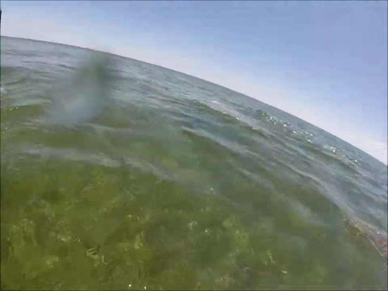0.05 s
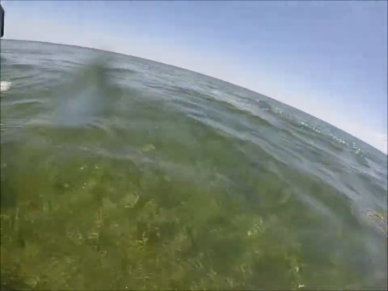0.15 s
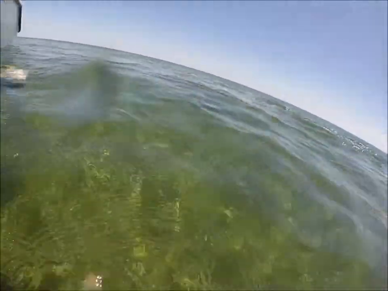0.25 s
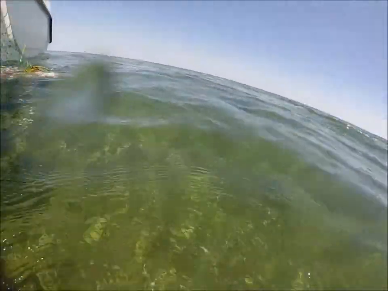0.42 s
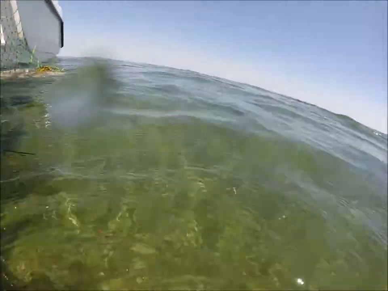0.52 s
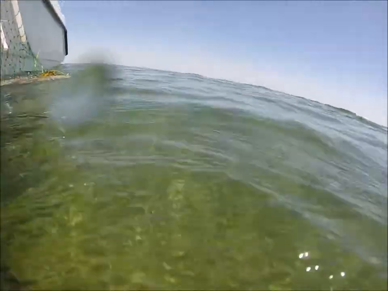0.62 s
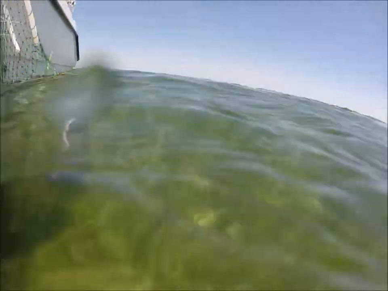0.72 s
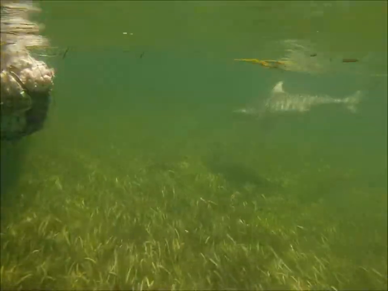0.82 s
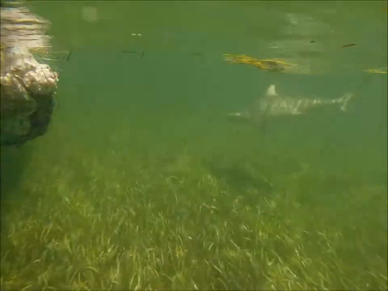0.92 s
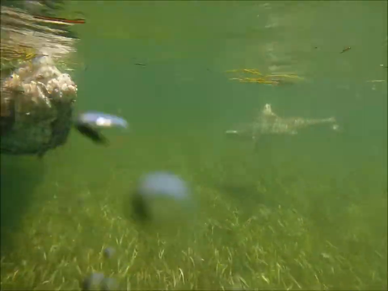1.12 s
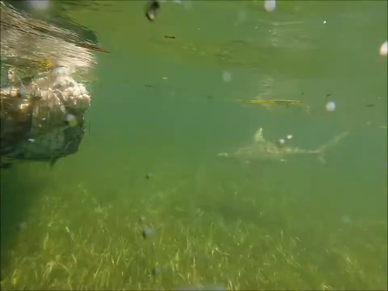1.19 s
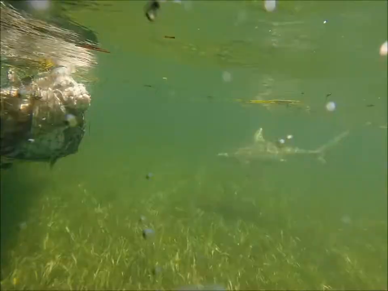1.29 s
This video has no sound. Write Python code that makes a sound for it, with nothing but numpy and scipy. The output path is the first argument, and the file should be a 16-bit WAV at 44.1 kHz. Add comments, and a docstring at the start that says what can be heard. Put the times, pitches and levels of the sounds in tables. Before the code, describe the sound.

Water gurgles and splashes against a small sealed case dunked into calm sea, then muffled quiet

```python
"""Bubbles and deep glugs ring against a small sealed case dipped twice into a calm sea, then kept under.
Each is a short, dying sine with three smaller ones close by, and faint case tones ring along.
Swarms of tiny rings make the small bubbles, slosh and fizz of the churn; short tones with puffs of noise
make drops snap on the shell. Low noise rumbles with the swell and a microphone hisses faintly."""
import sys
import numpy as np
from scipy import signal
from scipy.fft import rfft, irfft
from scipy.io import wavfile

SR = 44100
rng = np.random.default_rng(int(sys.argv[2]) if len(sys.argv) > 2 else 0)


def makeup_ratio(level_db):
    """Linear amplitude ratio for a level in decibels (20 dB per factor of ten)."""
    decades = np.asarray(level_db, float) / 20
    return 10 ** decades


def digitize_waveform(pressure):
    """Quantize a signal to 16-bit integers and store it at the path in sys.argv[1].

    Rows of a 2-D input are taken as channels; values are limited to [-1, 1].
    """
    field = np.atleast_2d(pressure).T
    bounded = np.clip(field, -1, 1)
    quanta = np.round(bounded * 32767).astype(np.int16)
    wavfile.write(sys.argv[1], SR, quanta)


N = 59535  # length in samples, 1.35 s


def rms_one(x):
    """Scales a sound to an rms of 1."""
    return x / np.sqrt(np.mean(x ** 2) + 1e-20)


def in_time(rows):
    """Columns of a table joined by straight lines in time."""
    seconds, *columns = np.transpose(rows)
    return [np.interp(np.arange(N) / SR, seconds, column) for column in columns]


def ring(clicks, hz, t60):
    """A resonance: a unit click sets a sine ringing that falls by 60 dB in t60 seconds."""
    shrink = makeup_ratio(-60 / (t60 * SR))  # per sample
    turn = 2 * np.pi * hz / SR
    # the tiny offset keeps the filter clear of extremely small numbers
    return signal.lfilter([0, np.sin(turn)], [1, -2 * shrink * np.cos(turn), shrink ** 2], clicks + 1e-18)


def coloured_noise(spectrum):
    """Noise of rms 1, shaped by rows of Hz and relative dB per Hz."""
    hz, db = np.transpose(spectrum)
    grid = np.fft.rfftfreq(N, 1 / SR) + 1e-3
    shape_db = np.interp(np.log(grid), np.log(hz), db, -150, -150)
    return rms_one(irfft(rfft(rng.standard_normal(N)) * makeup_ratio(shape_db), N))


def add(out, start_s, sound):
    """Mixes a short sound into out, cut off at its end."""
    i = int(start_s * SR)
    out[i:i + len(sound)] += sound[:len(out) - i]


def swarm(level_db, per_s, cycles, low_hz, high_hz, spread_db, tilt_db):
    """Many small rings at random moments, sizes and pitches, each swelling softly."""
    sizes = makeup_ratio(spread_db * np.minimum(rng.exponential(1, N), 4)) * rng.choice([-1, 1], N)
    born = rng.random(N) < per_s / SR
    dealt = rng.integers(0, 24, N)  # which of 24 pitches each ring gets
    pitches = np.geomspace(low_hz, high_hz, 24)
    gains = makeup_ratio(np.linspace(0, tilt_db, 24))  # tilt: highest pitch against lowest
    rings = np.zeros(N)
    for k, (hz, gain) in enumerate(zip(pitches, gains)):
        clicks = sizes * born * (dealt == k)
        # the second, shorter resonance softens the start
        rings += gain * hz * ring(ring(clicks, hz, cycles / hz), hz, 5 / hz)
    return makeup_ratio(level_db) * rms_one(rings)


def bubble(hz, cycles):
    """A pocket of air swells in about a cycle, rings and dies, rising a little in pitch."""
    c = np.arange(int((cycles + 2) / hz * SR)) * hz / SR  # time counted in cycles
    shape = (1 - np.exp(-c / BIRTH_CYCLES)) ** 2 * makeup_ratio(-60 * c / cycles)
    return shape * np.sin(2 * np.pi * c * (1 + 0.0004 * c))


# Single bubbles and glugs, loud and faint, before the case muffles them. Each row: time in seconds,
# level in dB, starting pitch in Hz, cycles to die by 60 dB.
BUBBLES = [(0.092, -26.5, 1150, 6), (0.1879, -13.5, 3040, 40), (0.2005, -3, 2550, 16.5),
           (0.2043, -7, 269, 9), (0.2104, -9.5, 2560, 57), (0.2253, -3, 1870, 20), (0.2361, -7.5, 979, 65),
           (0.2378, 0, 1090, 12), (0.2376, -14, 154, 12), (0.273, -11, 1030, 15.5), (0.2814, -14, 2420, 27),
           (0.2924, -6, 2070, 12.5), (0.3152, -11, 1055, 61.5), (0.3186, -10.5, 1400, 33),
           (0.3518, -12.5, 1910, 41), (0.355, -22.5, 222.4, 45), (0.4084, -9.5, 2930, 32),
           (0.4113, -2.5, 2220, 7.5), (0.4696, -6.5, 2160, 12), (0.5065, 4.5, 2150, 13.5),
           (0.508, -5, 1110, 32.5), (0.5122, 1.5, 2620, 17.5), (0.5116, -15.5, 229, 55),
           (0.5143, -9, 3640, 55), (0.5303, -5, 2380, 20), (0.5487, -10.5, 1245, 23), (0.545, -17, 207, 20),
           (0.5761, 1, 2063, 17), (0.5787, -8, 2250, 57.5), (0.5868, -13.5, 192, 11),
           (0.5901, 6, 1185, 6.5), (0.6128, 1.5, 1182, 22.5), (0.6191, 2, 1560, 29.5),
           (0.6218, -9, 1190, 20), (0.647, -12, 2340, 28), (0.6713, -12, 1725, 32), (0.6796, -1, 1660, 27),
           (0.6898, -13.5, 590, 22.5), (0.706, -2, 2470, 9.5), (0.7136, -5.5, 686, 9),
           (0.722, -12.5, 586, 20), (0.7399, -9, 741, 21.5), (0.746, -6.5, 389, 7.5), (0.7476, -4, 590, 12),
           (0.749, -12, 2067, 57), (0.7673, -4.5, 597, 9.5), (0.8005, -19, 1430, 48),
           (0.8041, -13.5, 960, 13.5), (0.834, -19, 2580, 43), (0.839, -15, 1560, 6),
           (0.8401, -7.5, 1007, 22), (0.8414, 8, 1810, 5), (0.8654, -4, 1490, 3.5),
           (0.8936, 5.5, 2740, 12.5), (0.8989, 4.5, 1600, 12.5), (0.9, -8.5, 1062, 17),
           (0.926, -29, 1680, 27.5), (0.981, -52, 1700, 62), (1.013, -43.5, 482, 70),
           (1.028, -24, 1510, 39), (1.0487, -21, 2394, 46), (1.059, -19, 1132, 13.5),
           (1.0597, -16.5, 612, 14.5), (1.078, -35.5, 868, 96), (1.121, -13, 597, 9),
           (1.1337, -32.5, 733, 90), (1.136, -34.5, 1367, 70), (1.159, -41.5, 1692, 66.5),
           (1.1685, -34, 683, 101), (1.198, -35, 2590, 59), (1.254, -34.5, 1300.0, 36.5),
           (1.3402, -23.5, 630, 6.5)]
BIRTH_CYCLES = 0.58  # how slowly a bubble swells


def bubbles():
    """Every single bubble sheds three smaller ones, which ring just after it at nearby pitches."""
    mate_db, loss_db_per_cycle = -10.5, 0.1  # long-ringing bubbles shed fainter ones
    pitch_spread, lag_cycles, longest_cycles = 0.2, 5.0, 20.3
    out = np.zeros(N)
    chance = rng.uniform(-0.997, 1, (len(BUBBLES), 3, 2))
    for (s, db, hz, cycles), mates in zip(BUBBLES, chance):
        group = [(s, db, hz, cycles)]
        for lag, size in mates:
            mate_s = s + lag_cycles * abs(lag) / hz
            mate_level_db = db + mate_db - loss_db_per_cycle * cycles
            mate_hz = hz * np.exp(pitch_spread * size)
            group.append((mate_s, mate_level_db, mate_hz, min(cycles, longest_cycles)))
        for one_s, one_db, one_hz, one_cycles in group:
            start_s = one_s - 2 * BIRTH_CYCLES / one_hz
            add(out, start_s, makeup_ratio(one_db) * bubble(one_hz, one_cycles))
    return out


# Tones of the case. Each row: pitch in Hz, level in dB, seconds to die by 60 dB.
CASE_MODES = [(205, -50, 0.13), (820, -62, .1), (1790, -61, 0.12)]


def case_ring(water):
    """The water's sound sets the case ringing faintly at its own pitches."""
    return sum(makeup_ratio(db) * ring(water, hz, t60) for hz, db, t60 in CASE_MODES)


def thump(slosh_db):
    """The slosh shoves the case: low noise around 76 Hz that follows its level."""
    hz = 75.6
    noise = coloured_noise([(hz / 2, -20), (hz, 0), (hz * 2, -20)])
    return makeup_ratio(slosh_db - 2.5) * noise


# Churn of water round the case. Each row: time in seconds, small bubbles in dB, fizz in dB, slosh in dB.
CHURN = [(0, -59.5, -102, -94), (.18, -59.5, -99, -46.5), (.198, -27, -57.5, -29),
         (.245, -18.5, -62, -25.5), (.26, -48.5, -69, -36), (.29, -31.5, -63, -27.5),
         (.36, -31, -56.5, -32), (.4, -55, -71.5, -42), (.415, -28.5, -51, -51.5), (.452, -64, -74, -40),
         (.47, -30.5, -61, -28.5), (.51, -26.5, -56, -30.5), (.59, -31, -67, -29.5),
         (.603, -42, -77.5, -40), (.63, -32.5, -40, -32.5), (.662, -43, -67.5, -43),
         (.705, -23, -23, -28.5), (.77, -32.5, -71, -43), (.82, -65.5, -76, -52), (.845, -37, -54, -38.5),
         (.885, -50, -73, -62), (.905, -24.5, -69.5, -54.5), (.925, -74, -103, -81),
         (.96, -61.5, -76, -58.5), (1.35, -65.5, -72.5, -61)]


def churn():
    """Churning water makes swarms of small bubbles, deep slosh and high fizz, and thumps the case."""
    small_db, fizz_db, slosh_db = in_time(CHURN)
    small = swarm(small_db, per_s=1200, cycles=22, low_hz=450, high_hz=3300, spread_db=3, tilt_db=10.5)
    slosh = swarm(slosh_db, per_s=300, cycles=12, low_hz=170, high_hz=320, spread_db=2.5, tilt_db=9.5)
    fizz = swarm(fizz_db, per_s=3200, cycles=18, low_hz=3600, high_hz=12800, spread_db=3, tilt_db=-14)
    return small + slosh, fizz, thump(slosh_db)


def stray_bubbles():
    """Faint bubbles drift past once the case is under water, from 0.93 s on."""
    under = np.arange(N) > 0.93 * SR
    return under * swarm(-59, per_s=220, cycles=40, low_hz=520, high_hz=2700, spread_db=3, tilt_db=-8)


def muffle(water):
    """The sealed case dulls the water: a low-pass at 4160 Hz."""
    return signal.sosfilt(signal.butter(4, 4160, fs=SR, output="sos"), water)


# Drops and films snapping on the shell. Each row: time in seconds, level in dB, centre pitch in Hz.
SNAPS = [(0.184, -28, 4400), (0.24, -20.5, 4660), (0.364, -23, 4140), (0.4097, -22, 4750),
         (0.47, -24, 4550), (0.4989, -6.5, 5030), (0.502, -19.5, 10240), (0.5081, -32.5, 8550),
         (0.513, -22, 8500), (0.5133, -3.5, 3760), (0.5175, -22.5, 10500), (0.533, -29, 6800),
         (0.5654, -14, 5250), (0.607, -13.5, 4570), (0.613, -11.5, 5240), (0.618, -25.5, 8600),
         (0.6316, -14, 5170), (0.648, -36, 8700), (0.6535, -37, 10600), (0.6715, -12.5, 5520),
         (0.6791, -10, 8700), (0.6866, -8.5, 9720), (0.6957, -5, 8260), (0.709, -32, 4400),
         (0.72, -10, 8500), (0.733, -28, 8950), (0.7513, -7.5, 6440), (0.774, -34, 8300.0),
         (0.787, -34, 7940), (0.834, -50, 9600), (0.8421, -22.5, 6360), (0.842, -35.5, 11700),
         (0.856, -36, 7000), (0.866, -38, 9100), (0.8943, -9.5, 7100), (0.9022, -3, 5550),
         (0.904, -22, 12960), (0.968, -38.5, 4120), (1.0285, -23, 6020), (1.146, -40.5, 5940),
         (1.195, -35.5, 5600)]


def snaps():
    """A snap is a tiny ring, a puff of noise round its pitch and a broad edge."""
    attack_s, noise_t60_s, ring_cycles = 0.00099, 0.007, 30
    width = 0.16  # of the puff's band, as a share of the pitch
    puff_db, edge_db = 9, -6
    top_hz = 0.45 * SR
    t = np.arange(1200) / SR
    noise = rng.standard_normal((len(SNAPS), len(t))) * makeup_ratio(-60 * t / noise_t60_s)
    rise = (1 - np.exp(-t / attack_s)) ** 2
    out = np.zeros(N)
    for (s, db, hz), burst in zip(SNAPS, noise):
        narrow = signal.butter(2, [hz / (1 + width), min(hz * (1 + width), top_hz)], "band", fs=SR)
        broad = signal.butter(2, [hz / 2.2, min(hz * 2, top_hz)], "band", fs=SR)
        tone = 0.5 * np.sin(2 * np.pi * hz * t) * makeup_ratio(-60 * t * hz / ring_cycles)
        puff = makeup_ratio(puff_db) * signal.lfilter(*narrow, burst)
        edge = makeup_ratio(edge_db) * signal.lfilter(*broad, burst)
        add(out, s - attack_s, makeup_ratio(db) * rise * (tone + puff + edge))
    return out


# Strength of the swell's rumble. Each row: time in seconds, level in dB.
SWELL = [(0, -30.5), (.16, -35.5), (.24, -35.5), (.33, -30.5), (.4, -41.5), (.49, -27.5), (.6, -48),
         (.68, -23.5), (.81, -62), (.85, -38.5), (.93, -43.5), (1.11, -39.5), (1.35, -34)]
# Colour of the rumble. Each row: frequency in Hz, relative level in dB per Hz.
RUMBLE = [(18, -3), (40, 0), (65, -3), (90, -10.5), (170, -38)]


def rumble():
    """The swell rumbles in the case: low noise that comes and goes."""
    return makeup_ratio(in_time(SWELL)[0]) * coloured_noise(RUMBLE)


# Colour of the hiss. Each row: frequency in Hz, relative level in dB per Hz.
HISS = [(100, -28), (250, -16.5), (600, -29.5), (1200, -34.5), (2700, -37), (5000, -40), (13000, -56.5),
        (16500, -55.5)]
# Strength of the hiss, fading until 0.8 s, then rising slightly. Each row: time in seconds, level in dB.
HISS_LEVEL = [(0, -54.5), (.8, -79.5), (1.35, -74)]


def hiss():
    """The microphone's own faint noise."""
    return makeup_ratio(in_time(HISS_LEVEL)[0]) * coloured_noise(HISS)


def scene():
    """Water heard through the case, snaps and fizz on its shell, then rumble and hiss."""
    churned_water, fizz, thumps = churn()
    water = bubbles() + churned_water
    water += case_ring(water)
    water += stray_bubbles()
    shell = snaps() + fizz
    return (muffle(water) + shell + rumble() + thumps + hiss())[None]


def band_limit(x):
    """A steep low-pass at the top of the band."""
    return signal.sosfilt(signal.butter(12, 16460, fs=SR, output="sos"), x)


def record(dry):
    """The loudest peaks are rounded, then the treble is cut above 14400 Hz."""
    rounded = dry / (1 + dry ** 8) ** (1 / 8)
    mix = signal.sosfilt(signal.butter(8, 14400, fs=SR, output="sos"), rounded)
    return band_limit(mix)


dry = scene()
out = record(dry)
digitize_waveform(out)
```